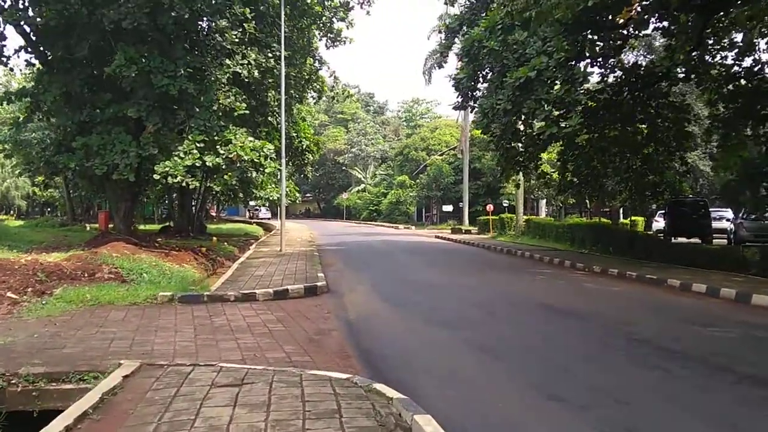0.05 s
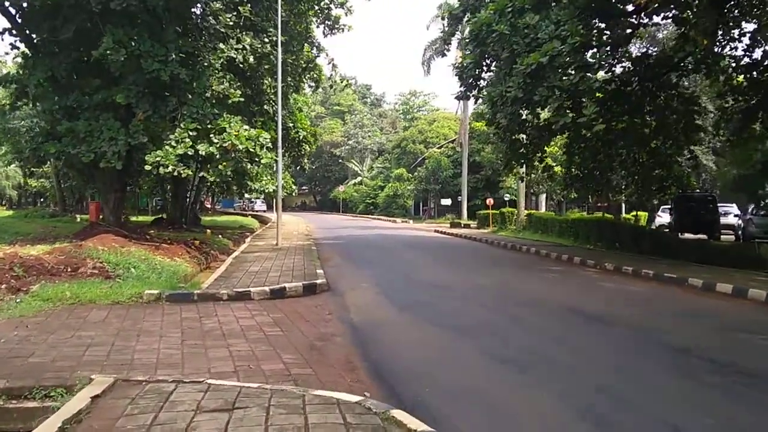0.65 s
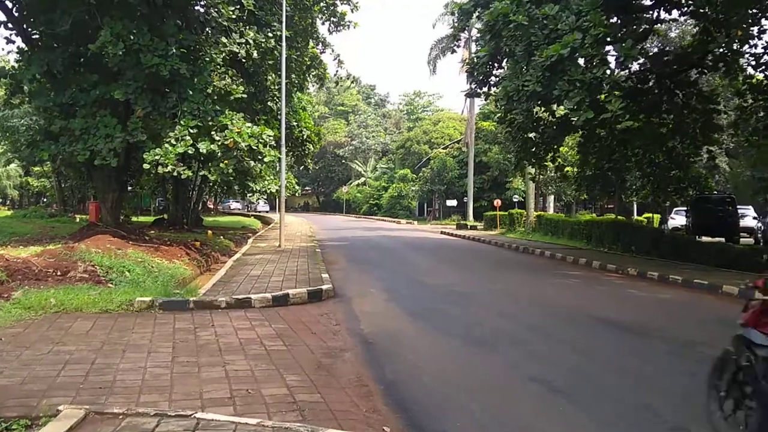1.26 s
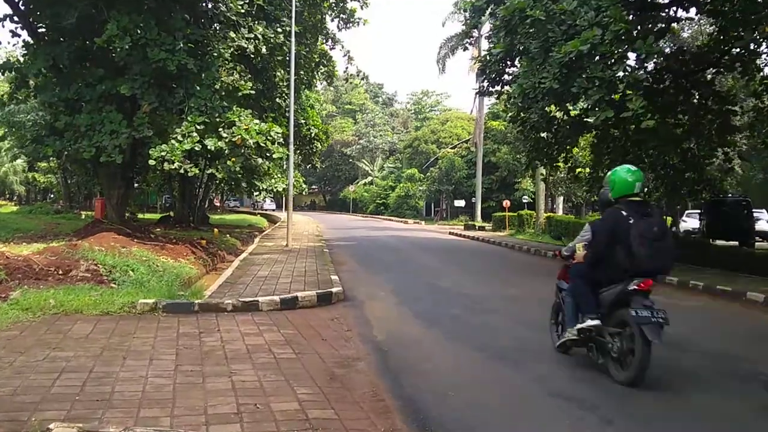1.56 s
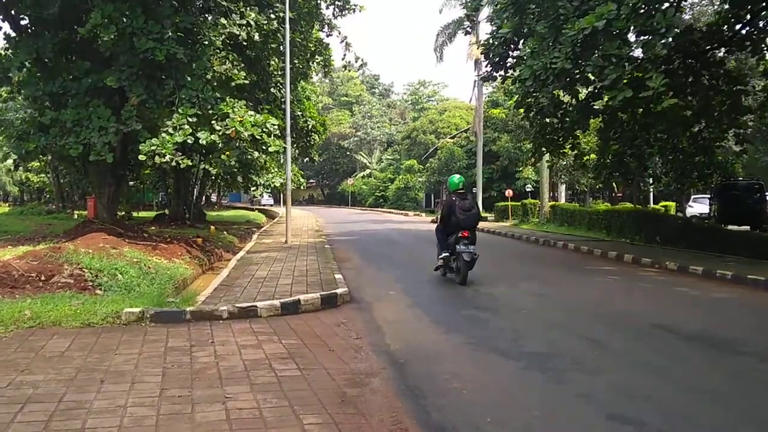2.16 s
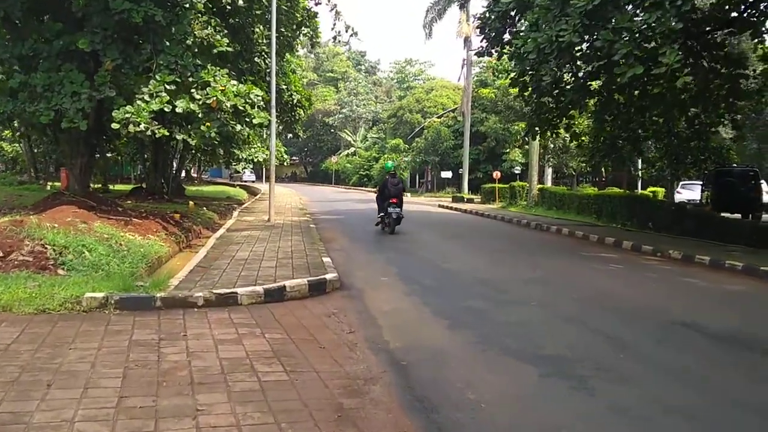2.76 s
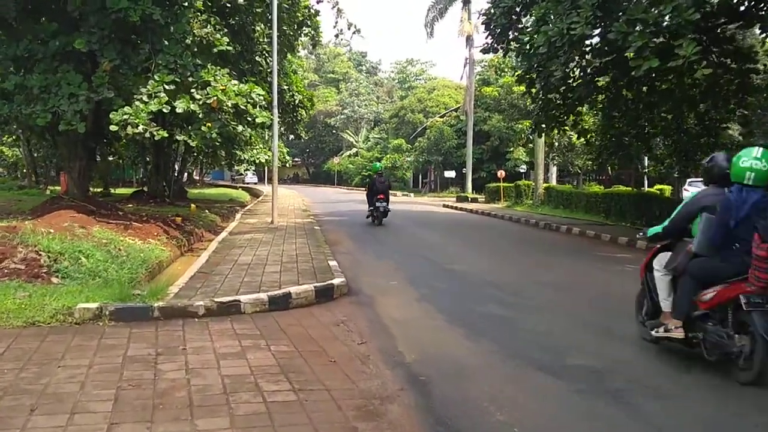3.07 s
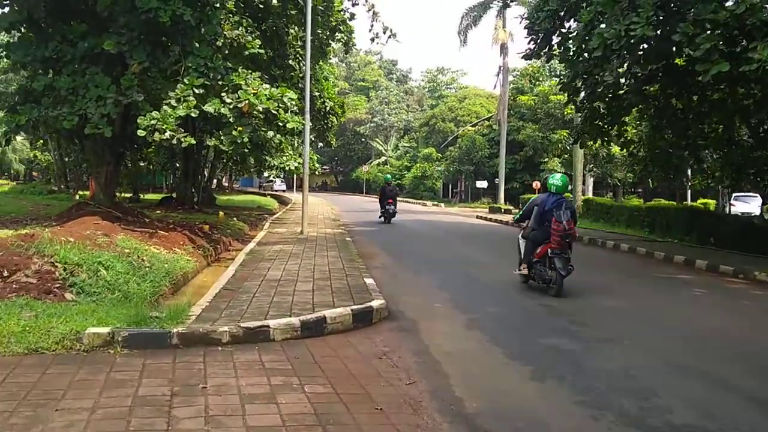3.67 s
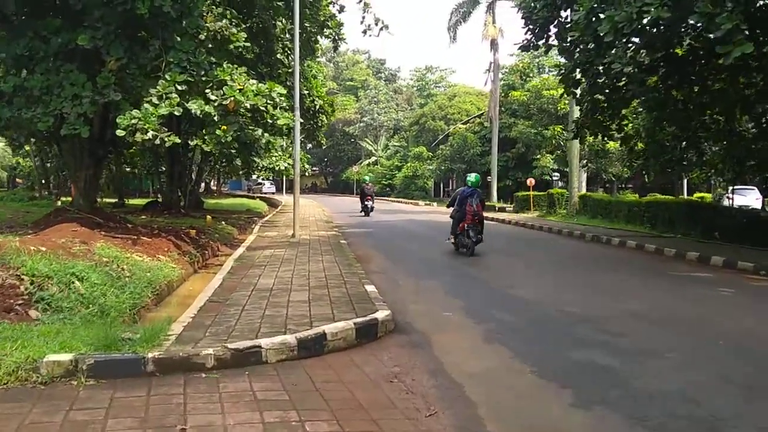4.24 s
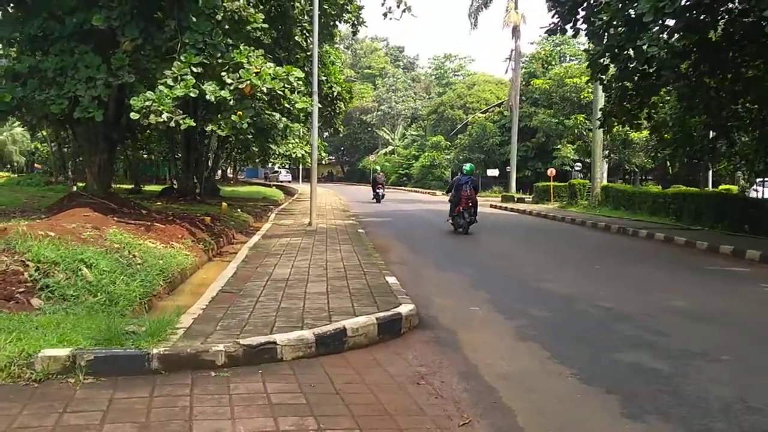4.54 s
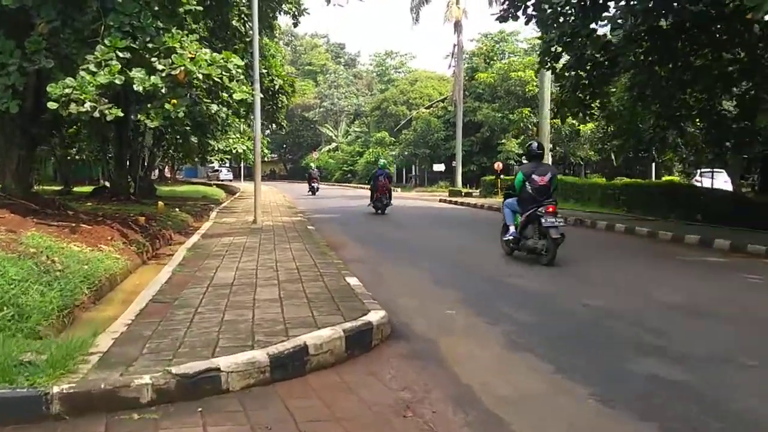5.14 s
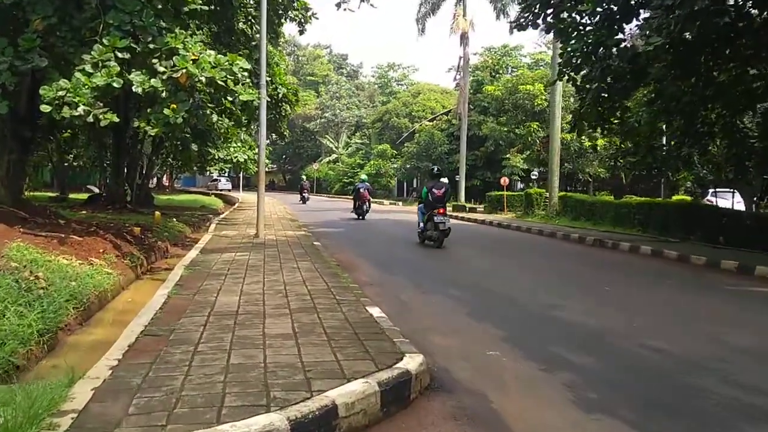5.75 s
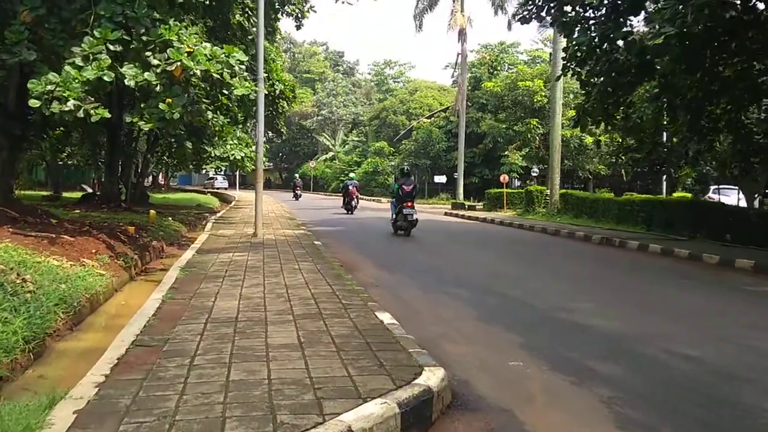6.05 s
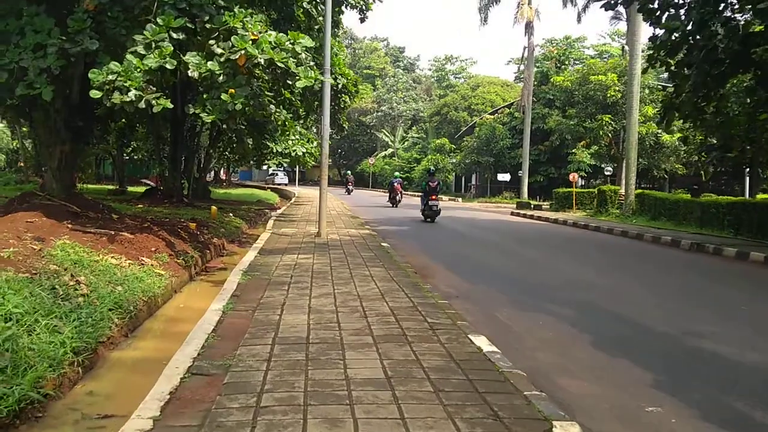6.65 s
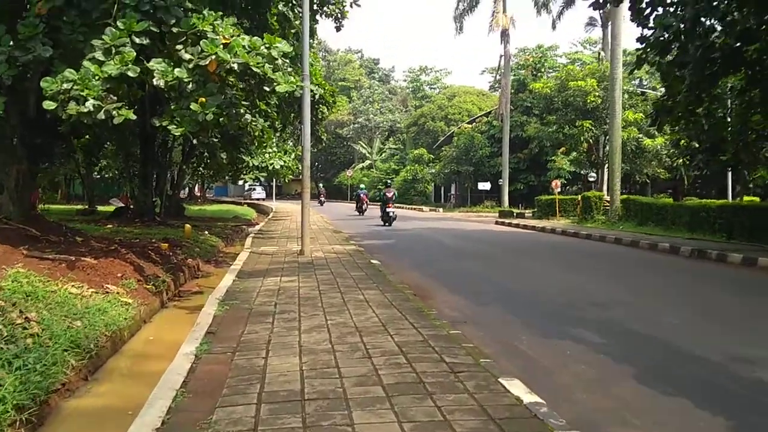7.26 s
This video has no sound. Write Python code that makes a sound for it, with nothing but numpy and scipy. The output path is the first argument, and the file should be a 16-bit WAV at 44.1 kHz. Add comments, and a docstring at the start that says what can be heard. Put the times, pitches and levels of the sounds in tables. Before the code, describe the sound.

Three scooters pass close by one after another and ride away, engines puttering and tyres hissing, then gritty footsteps and wind on the microphone.

```python
"""On the pavement of a tree-lined road, three single-cylinder scooters pass close by, one after another,
while a slower engine beats further off. Each firing thumps the exhaust, puffs gas and rings the muffler;
the trees scatter the engines back, and tyres roar and hiss over a low drone of traffic.
The stereo microphone is carried along: wind buffets it, grit crunches underfoot, a bird chirps."""
import sys
import numpy as np
from scipy import signal
from scipy.fft import rfft, irfft, next_fast_len
from scipy.io import wavfile

SR = 44100
rng = np.random.default_rng(int(sys.argv[2]) if len(sys.argv) > 2 else 0)


def wav_record(signal):
    """Record a signal, one row per channel, as 16-bit PCM in the file named by sys.argv[1]."""
    frames = np.transpose(np.atleast_2d(signal))
    bounded = np.clip(frames, -1, 1)
    # unit amplitude maps onto the largest positive 16-bit level
    quanta = np.round(bounded * 32767).astype(np.int16)
    wavfile.write(sys.argv[1], SR, quanta)


N = 326767
TIME, MS = np.arange(N) / SR, 1e-3
SIZE = next_fast_len(N + SR, True)
BINS = np.fft.rfftfreq(SIZE, 1 / SR)

# Top-end fizz of tyres and scuffing shoes. Each row: frequency in Hz, relative level in dB.
FIZZ = [(2000, -11.5), (5000, 4.5), (7000, -4.5), (9000, 3.5), (11000, 0), (13000, -7), (15500, -15.5)]


def first_scooter():
    """The first scooter by the microphone: a growling exhaust, with a sizzle as it nears."""
    # Engine speed. Each row: time in seconds, firings per second.
    speed = [(0, 34), (.6, 34.35), (1, 34.2), (1.5, 33.55), (1.7, 33.45), (2.2, 34), (2.7, 34.2)]
    # Engine at the microphone. Each row: time in seconds, relative level in dB.
    strength = [(0, -33), (.4, -24), (0.898, -22), (1.249, -19), (1.699, -26.5), (2.203, -29), (2.8, -47)]
    # Muffler resonances. Each row: pitch in Hz; decay, peak time, half-length in seconds; level in dB.
    rings = [(401, 0.0066, 1.1, 0.86, -36), (500, 0.0032, 0.51, 1, -38.5), (700, 0.0046, 2.1, 0.41, -57)]
    # Pipe tones. Each row: harmonic number, peak time and half-length in seconds, level in dB.
    notes = [(14, 1.2, 0.16, -35), (5, 0.79, 0.55, -32.5), (7, 1.38, 0.14, -25), (6, 1.65, 0.23, -32),
             (16, 0.8, 0.35, -43)]
    # The sizzle. Each row: time in seconds, pitch in Hz, relative level in dB.
    sizzle = [(.2, 5530, -49.5), (.55, 5615, -38.5), (1, 5595, -41), (1.4, 5590, -38.5), (1.7, 5340, -60)]
    sound = engine(speed, strength, pass_s=1.29, pipe=1, near_s=0.38, thump_db=-4, rasp_db=-5.5,
                   gas_db=4, casing_db=-20, casing_s=0.15, uneven_db=1, leads_ms=(0.37, 0.23))
    sound += muffler(speed, rings, lead_ms=0.49, uneven_db=5.5, jitter=0.0033)
    sound += tailpipe(speed, notes, lead_ms=0.44)
    return sound + amp(1.5) * ports(whine(sizzle, waver=0.0492, fade_s=0.095, flutter_hz=445), 0.05)


def second_scooter():
    """The second barks past and leaves a rising whirr. Returns its main sound and its close bark."""
    # Engine speed. Each row: time in seconds, firings per second.
    speed = [(0, 38.4), (1.4, 39.25), (1.6, 39.7), (2, 41.12), (2.45, 41.48), (2.7, 41.24), (3.05, 41.08),
             (3.35, 41.35), (3.65, 41.2), (4.1, 41.28), (4.6, 40.8), (5, 40.2), (6, 39.45), (6.6, 38),
             (7.4, 36.6)]
    # Engine at the microphone. Each row: time in seconds, relative level in dB.
    strength = [(0, -52), (1.4, -35), (2.398, -22.5), (3, -26), (3.9, -30), (5.5, -31), (6.6, -49)]
    # Muffler resonances. Each row: pitch in Hz; decay, peak time, half-length in seconds; level in dB.
    rings = [(348.5, 0.0079, 2.65, 0.23, -23.5), (433, 0.0089, 2.46, 0.16, -29),
             (610, 0.0033, 2.42, 0.34, -33.5), (1270, .0014, 2.24, 0.46, -32),
             (1296, 0.0039, 2.75, 0.32, -36.5)]
    # Pipe tones. Each row: harmonic number, peak time and half-length in seconds, level in dB.
    notes = [(14, 3.8, 0.6, -41), (11, 2.61, 0.14, -38), (19, 3.2, 0.4, -52)]
    # The whirr. Each row: time in seconds, pitch in Hz, relative level in dB.
    whirr = [(2.7, 2690, -49), (2.88, 2754, -49), (3, 3580, -53), (3.2, 4010, -51), (3.6, 3840, -67),
             (4, 4000, -58)]
    # One exhaust beat from in front and from behind. Each row: frequency in Hz, relative level in dB.
    beat_ahead = [(40, -45.5), (82, -2.5), (123, -20), (165, -18), (205, 2), (247, -13.5), (290, -0.5),
                  (350, -9.5), (440, -16), (510, -32), (600, -19), (700, -15), (900, -21), (1200, -24),
                  (2000, -44), (5000, -67)]
    beat_behind = [(40, -47.5), (82, -14.5), (123, -12.5), (165, 1), (205, 1), (247, -5), (290, -7.5),
                   (340, -17.5), (430, -25), (510, -29.5), (577, -20.5), (650, -29.5), (780, -21.5),
                   (1150, -38), (1800, -34.5), (5000, -78)]
    # Those beats at the microphone. Each row: time in seconds, level in dB.
    ahead_db = [(1.501, -30), (1.9, -24.5), (2.3, -25.5), (2.55, -30), (2.8, -39)]
    behind_db = [(2.3, -35), (2.6, -23.5), (2.85, -21), (3.3, -22), (3.8, -23), (4.3, -27.5), (4.8, -29.5),
                 (5.6, -28.5), (6.1, -31), (6.6, -51)]
    sound = engine(speed, strength, pass_s=2.94, pipe=0.95, near_s=0.3, thump_db=-4.5, rasp_db=-5,
                   gas_db=-5, casing_db=-36, casing_s=0.17, uneven_db=0.8, leads_ms=(0.35, 0.0054))
    sound -= tailpipe(speed, notes, lead_ms=0.27)
    sound += amp(1.5) * ports(whine(whirr, waver=0.0367, fade_s=0.22, flutter_hz=600), 0.05)
    close = airbox(speed)
    close += muffler(speed, rings, lead(2.79, 0.35, 0.018), uneven_db=2.8, jitter=0.00083, cut_hz=107)
    close += putter(speed, beat_ahead, ahead_db, lead_ms=0.41, uneven_db=-0.1)
    close += putter(speed, beat_behind, behind_db, lead(2.68, 0.4, 0.0058), uneven_db=1.1 * receding(3.7))
    return sound, close


def third_scooter():
    """The third slows as it passes; its gears whine and its drive belt sings lower."""
    # Engine speed. Each row: time in seconds, firings per second.
    speed = [(2.8, 36.4), (3.2, 35.1), (3.7, 34), (4.2, 32.3), (4.7, 30.9), (5.2, 30), (6, 29.3)]
    # Engine at the microphone. Each row: time in seconds, relative level in dB.
    strength = [(2.8, -48), (3.5, -31), (4.1, -33.5), (4.55, -32), (4.8, -29.5), (5.5, -32), (6, -35)]
    # Muffler resonances. Each row: pitch in Hz; decay, peak time, half-length in seconds; level in dB.
    rings = [(429, 0.009, 4.27, 0.29, -36), (267, 0.0097, 4.96, 0.27, -33.5),
             (548, 0.0037, 5.46, 0.42, -39), (1375, 0.003, 5.52, 0.44, -46.5),
             (1280, .002, 6.08, 0.18, -44)]
    # Gear and belt tones. Each row: time in seconds, pitch in Hz, relative level in dB.
    gears = [(3.3, 2980, -84), (4.0, 2706, -44.5), (4.6, 2497, -44), (5.1, 2430, -40.5), (5.6, 2315, -43),
             (6.0, 2400, -49), (6.6, 2200, -73)]
    belt = [(3.2, 2030, -50), (3.7, 1956, -38.5), (4.25, 1920, -33), (4.5, 1780, -58), (5.4, 1638, -37),
            (6.4, 1600, -46), (6.9, 1640, -41), (7.4, 1550, -46)]
    sound = engine(speed, strength, pass_s=4.46, pipe=0.75, near_s=0.27, thump_db=-4, rasp_db=-7,
                   gas_db=-7, casing_db=-1, casing_s=0.041, uneven_db=0.44, leads_ms=(0.22, 0.022))
    sound += muffler(speed, rings, lead_ms=0.055, uneven_db=2.5, jitter=0.035)
    drive = amp(-0.5) * whine(gears, waver=0.0243, fade_s=0.1, flutter_hz=202)
    drive += amp(-2) * whine(belt, waver=0.01165, fade_s=0.075, flutter_hz=70)
    return sound + ports(drive, 0.3)


def slow_engine():
    """A slower engine further off. Returns its main sound and its direct throb."""
    # Engine speed. Each row: time in seconds, firings per second.
    speed = [(0, 23.35), (.3, 23.7), (.6, 24.1), (1.4, 25.9), (2, 25.5), (3, 25.7), (4.5, 24.2), (6, 24),
             (7.2, 23.15)]
    # Engine and throb at the microphone. Each row: time in seconds, relative level in dB.
    strength = [(0, -33), (.4, -25), (.8, -30), (1.502, -24.5), (3, -65), (4.5, -25), (5.3, -51),
                (6.5, -38.5), (7.1, -26), (7.35, -47)]
    throb_db = [(0, -22), (.4, -29), (.7, -28.5), (1.1, -34), (1.6, -57), (6.3, -55), (6.8, -37),
                (7.15, -32), (7.4, -44)]
    # Muffler resonances. Each row: pitch in Hz; decay, peak time, half-length in seconds; level in dB.
    rings = [(526, 0.0083, 0.22, 0.39, -39), (139, 0.0087, 7.08, 0.56, -27), (362, 0.0097, 6.7, 0.37, -40),
             (504, 0.0054, 6.6, .25, -45.5), (582, 0.0042, 7.17, 0.099, -39), (1240, .004, 7.2, 0.12, -43),
             (1510, 0.0039, 7.15, 0.47, -47)]
    # One beat, facing the microphone. Each row: frequency in Hz, relative level in dB.
    beat = [(30, -51), (85, -15), (135, -1.5), (175, 0.5), (240, -12.5), (310, -6), (400, -8), (520, -14.5),
            (700, -38), (1200, -22), (4000, -58)]
    sound = engine(speed, strength, pass_s=0.41, pipe=0.885, near_s=0.6, thump_db=-4, rasp_db=-15,
                   gas_db=18, casing_db=-18, casing_s=0.082, uneven_db=0.42, leads_ms=(0.41, 0.25))
    sound += muffler(speed, rings, lead_ms=0.46, uneven_db=6, jitter=0.01)
    return sound, putter(speed, beat, throb_db, lead_ms=0.44, uneven_db=6)


def engine(speed, strength, pass_s, pipe, near_s, thump_db, rasp_db, gas_db, casing_db, casing_s,
           uneven_db, leads_ms):
    """Each firing thumps a muffler tuned by the factor pipe; rasp and clatter stand out at close range."""
    # Exhaust thump, gas rasp and engine casing. Each row: frequency in Hz, relative level in dB.
    thump_spectrum = [(30, -39), (55, -46), (80, -21.5), (125, -6.5), (165, -4), (205, 0.5), (250, -9.5),
                      (330, -13), (430, -21.5), (600, -53), (1000, -24.5), (2000, -47), (6000, -83)]
    rasp_spectrum = [(60, -33.5), (220, -17), (300, 5.5), (420, 8.5), (520, 0), (750, -2), (1200, -1.5),
                     (2000, -13), (5000, -20), (15000, -41)]
    casing_spectrum = [(100, -28), (600, -10), (1050, 1), (1210, 15), (1300, -8), (1400, 4.5), (1600, 0.5),
                       (2200, -11), (3200, -52), (4500, -5), (5700, -62), (8000, -35), (15000, -33)]
    turns = cycles(speed)
    pulses = firings(turns + 0.004 * wander(20), uneven_db)
    pulses *= amp(2 * receding(pass_s) * wander(26))  # paths among the trees make it waver
    gas = unit((0.3 + np.exp(-(turns % 1) / 0.35)) * rng.standard_normal(N))
    nearing = 1 / np.sqrt(1 + ((TIME - pass_s + 0.66) / near_s) ** 2)
    since = (TIME - pass_s) / casing_s
    alongside = 1 / np.sqrt(1 + np.where(since < 0, 3 * since, since) ** 2)  # comes fast, leaves slowly
    thump = colour(pulses, [(hz * pipe, db) for hz, db in thump_spectrum])
    modes = rattle(pulses)
    rasp = colour(0.19 * unit(pulses) + modes + amp(gas_db) * gas, rasp_spectrum)
    exhaust = ports(amp(thump_db) * thump + amp(rasp_db) * nearing * rasp, lead(pass_s, *leads_ms))
    clatter = ports(amp(casing_db) * alongside * colour(modes + 0.42 * gas, casing_spectrum), 0.067)
    return level(strength, 0.39) * (exhaust + clatter * amp([[-5], [1]]))


def cycles(speed):
    """Firing cycles an engine has turned at every sample, starting a quarter cycle in."""
    return 0.25 + np.cumsum(curve(speed, 1)) / SR


def firings(turns, uneven_db, uneven_hz=20):
    """One pulse each cycle, of uneven strength."""
    fired = np.diff(np.floor(turns), prepend=0) > 0
    return fired * amp(uneven_db * wander(uneven_hz))


def rattle(pulses, ring_s=0.0033, drift_hz=0.87):
    """The muffler's dense, short modes answer each firing; their mix drifts as the scooter moves."""
    t = np.arange(2048) / SR
    rings = rng.standard_normal((4, len(t))) * np.sqrt(t / ring_s) * np.exp(-t / ring_s)
    shares = np.array([wander(drift_hz) for _ in rings])
    shares /= np.linalg.norm(shares, axis=0)
    return unit((shares * signal.oaconvolve(pulses[None], rings, axes=1)[:, :N]).sum(0))


def muffler(speed, rings, lead_ms, uneven_db, jitter, cut_hz=60):
    """Each firing rings broad resonances, which swell and fade as the machine turns its flank."""
    pulses = firings(cycles(speed) + jitter * wander(27.6), uneven_db, uneven_hz=27)
    t = np.arange(2048) / SR
    growl = 0
    for hz, decay, peak_s, half_s, db in rings:
        ring = np.sqrt(t / decay) * np.exp(-t / decay) * np.sin(2 * np.pi * hz * t)
        growl += amp(db) * swell(peak_s, half_s) * unit(signal.oaconvolve(pulses, ring)[:N])
    return ports(signal.lfilter(*signal.butter(2, cut_hz, "high", fs=SR), growl), lead_ms)


def putter(speed, beat, strength, lead_ms, uneven_db):
    """An exhaust heard directly: one short beat a firing, with quiet between."""
    pulses = firings(cycles(speed), uneven_db)
    return ports(level(strength, 0.2) * colour(pulses, beat), lead_ms)


def tailpipe(speed, notes, lead_ms):
    """Engine harmonics fall on resonances of the pipe and swell while it points at the microphone."""
    turns = cycles(speed)
    tones = 0
    for order, peak_s, half_s, db in notes:
        gain = amp(db - 10 * ((TIME - peak_s) / half_s) ** 2)
        tones -= gain * unit(np.sin(2 * np.pi * order * turns))
    return ports(tones * (1 + 0.22 * wander(6.3)), lead_ms)


def airbox(speed, stroke_share=0.1):
    """A short burst of intake noise at each firing rings the casing."""
    # The bark as the scooter draws level. Each row: time in seconds, relative level in dB.
    bark_db = [(2.1, -41), (2.35, -35.5), (2.62, -57), (2.76, -30), (2.9, -42.5), (3.1, -38), (3.4, -79),
               (3.9, -41.5)]
    # Airbox resonance. Each row: frequency in Hz, relative level in dB.
    intake = [(100, -17), (600, -7), (1050, -4), (1220, 17), (1350, -1), (1600, -2), (2200, -22),
              (4000, -46), (15000, -69)]
    gulps = np.exp(-(cycles(speed) % 1) / stroke_share) * rng.standard_normal(N)
    return ports(level(bark_db, 0.1) * colour(gulps, intake), 0.053) * amp([[-5.5], [0.5]])


def whine(rows, waver, fade_s, flutter_hz):
    """A gliding tone that wavers in pitch and strength; fast flutter makes it fuzzy."""
    turns = np.cumsum(curve(rows, 1) * (1 + waver * wander(flutter_hz))) / SR
    tone = np.sin(2 * np.pi * turns) * (1 + 0.5 * wander(flutter_hz / 2))
    return level(rows, fade_s) * unit(tone)


def tyres():
    """Tyres on rough asphalt, in four bands from roar to fizz; the tread flickers with the surface."""
    # The three lower bands. Each row: frequency in Hz, relative level in dB.
    roar_spectrum = [(100, -29), (300, -5), (530, 3.5), (750, 0.5), (950, 2.5), (1200, -11), (2500, -81)]
    rush_spectrum = [(400, -40), (780, -57), (1000, 5.5), (1300, 4.5), (1900, 1.5), (2400, 2),
                     (4000, -21.5), (9000, -50)]
    hiss_spectrum = [(500, -100), (1800, 7.5), (2700, 2), (3500, 4), (4300, 2), (5000, 2.5), (5700, 6),
                     (6600, -6.5), (8000, -15.5), (10000, -5), (15000, -48)]
    roar = noise(roar_spectrum) * tyre_gain(band=0, ahead=1.11, behind=0.99, far_db=-42.5)
    rush = noise(rush_spectrum) * tyre_gain(band=1, ahead=0.16, behind=0.12, far_db=-36)
    hiss = noise(hiss_spectrum) * tyre_gain(band=2, ahead=1, behind=0.38, far_db=-44)
    fizz = noise(FIZZ) * tyre_gain(band=3, ahead=-0.24, behind=0.48, far_db=-59, shade_db=6)
    middle = amp(-1 + wander(23)) * roar + amp(-3 + wander(17)) * rush
    high = amp([[0.5], [-1.5]]) * hiss + amp(2.5) * fizz
    return dips() * (middle + amp(1.2 * wander(29)) * high)


def tyre_gain(band, ahead, behind, far_db, shade_db=0):
    """Tyre noise falls as 1 / distance and beams obliquely fore and aft, over a floor of far traffic."""
    # One scooter a row: time abreast and time to ride its distance from the microphone in seconds;
    # beam ahead, swish abreast and beam behind in dB; roar, rush, hiss and fizz in relative dB.
    passes = [(1.25, 0.21, 5.5, 0, 3, -30.5, -29.5, -60, -32),
              (2.79, 0.44, 5, -2.5, 0, -32, -35, -42.5, -46.5),
              (4.53, 0.4, 9.5, 4.5, 8.5, -35.5, -34.5, -46.5, -44)]
    power = amp(far_db) ** 2
    for pass_s, near_s, ahead_db, swish_db, behind_db, *bands_db in passes:
        along = (TIME - pass_s) / near_s
        closeness = 1 / (1 + along ** 2)
        beam = 27 / 4 * (1 - closeness) ** 2 * closeness  # peaks at 1 either side of the pass
        db = bands_db[band] + beam * np.where(along < 0, ahead * ahead_db, behind * behind_db)
        db += swish_db * swell(pass_s, 0.08)
        db -= shade_db * np.maximum(pass_s - TIME, 0) ** 2  # muffled until it arrives
        power += closeness * amp(db) ** 2
    return np.sqrt(power)


def dips(fall_s=0.065):
    """Gain of the tyre noise: it dips quickly and recovers slowly."""
    # The dips. Each row: start in seconds, depth in dB, recovery in seconds.
    drops = [(1.41, 3, 0.23), (5.61, 0.5, 0.21), (6.199, 6.5, 0.8)]
    return amp(-sum(db * np.clip(age(s) / fall_s, 0, 1) * np.exp(-age(s) / recovery)
                    for s, db, recovery in drops))


def steps(grain_db=2.2, snap_s=0.0023):
    """Below the microphone, each footfall scrapes the paving and crushes grit; a few stones snap."""
    # Grit under a shoe. Each row: start in seconds, relative level in dB, rise and decay in seconds.
    crushes = [(5.129, -28, 0.027, 0.02), (5.586, -24.5, 0.0026, 0.0098), (5.599, -34.5, .003, .011),
               (5.92, -41, 0.065, 0.03), (6.108, -27.5, 0.0087, 0.012), (6.135, -39, .003, 0.0074),
               (6.16, -37, 0.0027, 0.013)]
    # Snapping stones. Each row: start in seconds, relative level in dB.
    stones = [(3.55, -34), (5.5822, -24.5), (6.1685, -29)]
    # Crunching grit and scraping sole. Each row: frequency in Hz, relative level in dB.
    grit = [(200, -28), (1200, -48), (2000, 9.5), (2800, 8), (4200, -3), (5600, 7), (7500, -31),
            (11000, -3), (15500, -23)]
    sole = [(120, -27), (350, 12), (700, 10), (1400, -5), (2200, 11), (4000, -23), (9000, -49)]
    press = sum(amp(db) * np.clip(age(s) / rise, 0, 1) * np.exp(-age(s + rise) / decay)
                for s, db, rise, decay in crushes)
    snaps = sum(amp(db) * (TIME > s) * np.exp(-age(s) / snap_s) for s, db in stones)
    crunch = unit(amp(grain_db * wander(370))) * (noise(grit) + amp(-1) * noise(sole))
    return (press + snaps) * (crunch + amp(-6) * noise(FIZZ))


def low_thumps(hz=175, decay_s=0.0033):
    """Soft low thumps close to the microphone, some with the footfalls, louder on the left."""
    # The thumps. Each row: start in seconds, relative level in dB.
    thumps = [(5.578, -19), (6.13, -29), (6.149, -19), (6.248, -19), (6.281, -24), (6.344, -20.5),
              (6.492, -22)]
    sound = 0
    for s, db in thumps:
        t = age(s)
        sound += amp(db) * t / decay_s * np.exp(1 - t / decay_s) * np.sin(2 * np.pi * hz * t)
    return sound * amp([[7], [0]])


def wind(breeze_db=-46.5, lumps_db=3):
    """Lumpy buffeting, different at each microphone port, swells in gusts above a light breeze."""
    # Gusts. Each row: peak time in seconds, relative level in dB, half-length in seconds.
    gusts = [(4.29, -37, 0.067), (5.037, -40, 0.076), (5.45, -47, 0.24), (5.91, -39.5, 0.46),
             (6.15, -27.5, 0.028), (6.3, -39, 0.19), (6.828, -35.5, 0.12), (7.165, -31.5, 0.11)]
    # Wind rumble. Each row: frequency in Hz, relative level in dB.
    buffet = [(20, -47), (45, -24), (75, -9), (110, -0.5), (170, -4.5), (260, -18), (400, -18),
              (750, -30.5), (2000, -68)]
    strength = amp(breeze_db) + sum(amp(db) * swell(s, half_s) for s, db, half_s in gusts)
    lumps = [colour(rng.standard_normal(N), buffet) * amp(lumps_db * wander(8.2)) for _ in range(2)]
    return strength * unit(np.array(lumps)) * amp([[6.3], [5.7]])


def bird():
    """A bird gives a high chirp, then a fainter, lower one."""
    # One table a call. Each row: time in seconds, pitch in Hz, relative level in dB.
    calls = [
        [(7.285, 5600, -62), (7.31, 5390, -48), (7.324, 5690, -36), (7.333, 4950, -49), (7.345, 4700, -48)],
        [(7.34, 3190, -56), (7.37, 3270, -52), (7.41, 3190, -53)],
    ]
    chirps = sum(whine(call, waver=0.041, fade_s=0.004, flutter_hz=690) for call in calls)
    return amp(1) * ports(chirps, 0.022)


def drone():
    """Traffic drones low among the trees, all round the microphone."""
    # Its colour. Each row: frequency in Hz, relative level in dB.
    spectrum = [(25, -40), (50, -62), (80, -2.5), (130, 2), (190, 2.5), (270, -4), (340, -2), (420, -10.5),
                (650, -43), (1500, -80)]
    # Its strength. Each row: time in seconds, level in dB.
    strength = [(0, -23.5), (1.6, -26), (2.4, -28), (3, -30), (3.55, -28), (4.4, -24), (4.8, -29.5),
                (5.5, -25.5), (6.4, -34.5), (7.4, -38)]
    return amp(curve(strength, 1) + 2 * wander(66)) * noise(spectrum, lead_ms=0.14)


def trees(x, t60=0.22, first_s=0.011, echoes_per_s=2000):
    """Trunks and leaves return a thin, scattered tail."""
    t = np.arange(SR) / SR
    taps = rng.standard_normal((2, SR)) * (rng.random((2, SR)) < echoes_per_s / SR)
    taps *= (t > first_s) * amp(-60 * t / t60)
    taps /= np.linalg.norm(taps, axis=1, keepdims=True)
    return irfft(rfft(x.mean(0), SIZE) * scatter(*rfft(taps, SIZE)), SIZE)[:, :N]


def ground_reflection(x, widths_hz=(170, 83)):
    """The reflection off the ground cancels two moving bands, so the far traffic turns hollow."""
    # One table a notch. Each row: time in seconds, centre in Hz, depth from 0 to 1.
    notches = [
        [(5.2, 780, 0), (5.6, 740, 0.13), (6.15, 760, 0), (6.35, 724, 0.7), (6.6, 680, .95), (6.9, 726, 0.8),
         (7.2, 810, 0.7), (7.4, 900, 1)],
        [(5.0, 1100, 0), (5.5, 1120, 0.9), (6.1, 1100, 0.7), (6.6, 1120, 0.3), (6.95, 1120, 0.7),
         (7.2, 1080, .8), (7.4, 1070, 1)],
    ]
    for notch, width_hz in zip(notches, widths_hz):
        carrier = np.exp(2j * np.pi * np.cumsum(curve(notch, 1)) / SR)
        pole = np.exp(-np.pi * width_hz / SR)
        band = 2 * (carrier * signal.lfilter([1 - pole], [1, -pole], x / carrier)).real
        x = x - curve(notch, 2) * band
    return x


def ports(x, lead_ms):
    """A point source reaches the microphone's left port first."""
    return np.array([x, np.interp(TIME - lead_ms * MS, TIME, x)])


def lead(pass_s, before_ms, after_ms):
    """The left port's head start shrinks as a machine goes by."""
    return after_ms + (before_ms - after_ms) * (1 - np.tanh((TIME - pass_s) / 0.2)) / 2


def receding(pass_s, recede_s=0.79):
    """Grows from 0 to 1 as a machine rides off among the trees."""
    return np.clip(age(pass_s) / recede_s, 0, 1) ** 2


def scatter(a, b, lead_ms=0):
    """Two unrelated spectra become a port pair that is alike in the bass."""
    # Scattered sound at the two ports. Each row: frequency in Hz, likeness from 0 to 1.
    likeness = [(50, 0.99), (200, 0.95), (450, 0.69), (900, 0.37), (1600, 0), (15000, 0.1)]
    same = read(likeness, BINS)
    right = same * a + np.sqrt(1 - same ** 2) * b
    return np.array([a, right * np.exp(-2j * np.pi * BINS * lead_ms * MS)])


def noise(spectrum, lead_ms=0):
    """Coloured noise arriving from all round."""
    white = scatter(*rfft(rng.standard_normal((2, SIZE))), lead_ms)
    return unit(irfft(white * amp(read(spectrum, BINS)), SIZE)[:, :N])


def colour(x, spectrum):
    """Minimum-phase filter, output at rms 1: each pulse rings after it strikes."""
    log_gain = np.log(amp(read(spectrum, abs(np.fft.fftfreq(8192, 1 / SR)))))
    ring = np.fft.ifft(np.exp(np.conj(signal.hilbert(log_gain)))).real[:4096]
    return unit(signal.oaconvolve(x, ring)[:N])


def wander(hz):
    """Random drift of rms 1, mostly slower than hz."""
    return unit(irfft(rfft(rng.standard_normal(SIZE)) / (1 + (BINS / hz) ** 4), SIZE)[:N])


def level(rows, fade_s):
    """Gain from a table's last column, dying away outside its times."""
    outside = np.maximum(rows[0][0] - TIME, 0) + age(rows[-1][0])
    return amp(curve(rows, -1)) * np.exp(-outside / fade_s)


def swell(peak_s, half_s):
    """A bell-shaped rise and fall."""
    return np.exp(-((TIME - peak_s) / half_s) ** 2)


def age(start_s):
    """Seconds since a start, zero before it."""
    return np.maximum(TIME - start_s, 0)


def curve(rows, column):
    """One column of a table at every sample."""
    rows = np.array(rows)
    return np.interp(TIME, rows[:, 0], rows[:, column])


def read(rows, hz, column=1):
    """Reads a table on a log-frequency axis."""
    rows = np.array(rows)
    return np.interp(np.log(hz + 1), np.log(rows[:, 0] + 1), rows[:, column])


def amp(db):
    """Decibels to gain."""
    return 10 ** (np.asarray(db) / 20)


def unit(x):
    """Scales to rms 1."""
    return x / np.sqrt(np.mean(x ** 2) + 1e-20)


def scene():
    """Engines and bird among the trees, tyres on the road, and wind, steps and low thumps close by."""
    first = first_scooter()
    second, bark = second_scooter()
    third = third_scooter()
    slow, throb = slow_engine()
    sources = first + second + third + slow + bird()
    direct = bark + throb
    echoes = amp(-1.5) * trees(sources + amp(-15.5) * direct)  # bark and throb arrive nearly dry
    roadside = ground_reflection(sources + direct + echoes + tyres() + drone())
    return roadside + wind() + steps() + low_thumps()


def record(dry, delay_ms=0.44, edge_hz=15400):
    """The recorder widens the stereo by taking a delayed copy of each side off the other, then filters."""
    # Widening. Each row: frequency in Hz, share of the other side taken off.
    crossfeed = [(50, 0.79), (1000, 0.84), (3400, 1), (5700, 0.3), (8000, 0.02), (15000, 0.024)]
    # Colour of the microphone ports. Each row: frequency in Hz, left gain and right gain in dB.
    port_db = [(101, 4, 2), (373, 0, -1), (1000, -2, -3.5), (2470, 1.5, 1.5), (5940, 5.5, 6), (7300, 7, 9),
               (9900, -10.5, -2), (15200, -2, -0.5)]
    delay = np.exp(-2j * np.pi * BINS * delay_ms * MS)
    heard = rfft(dry, SIZE)
    wide = heard - read(crossfeed, BINS) * delay * heard[::-1]
    wide *= amp([read(port_db, BINS, 1), read(port_db, BINS, 2)])
    low_pass = signal.firwin(511, edge_hz, window=("kaiser", 9), fs=SR)
    return signal.oaconvolve(irfft(wide, SIZE)[:, :N], low_pass[None], "same")


dry = scene()
out = record(dry)
wav_record(out)
```